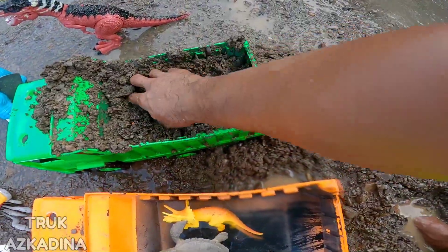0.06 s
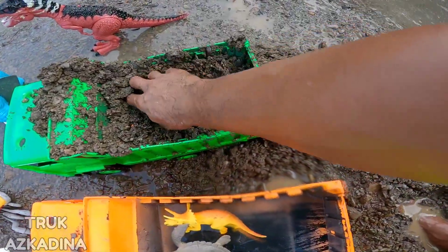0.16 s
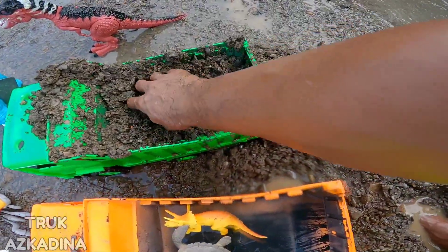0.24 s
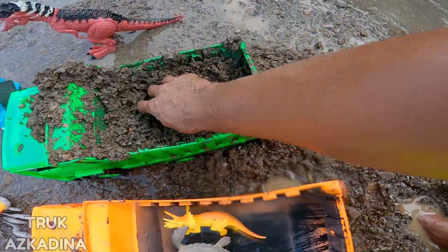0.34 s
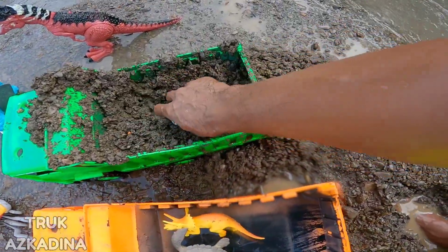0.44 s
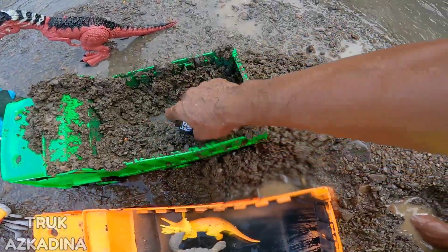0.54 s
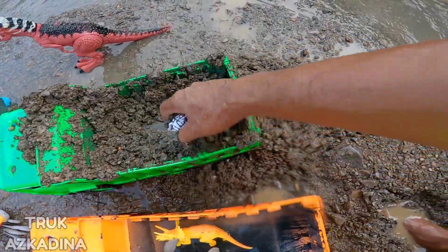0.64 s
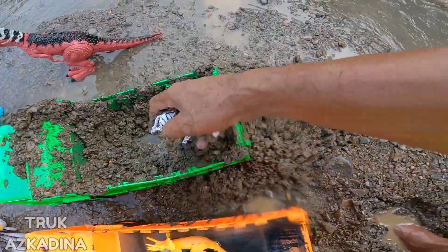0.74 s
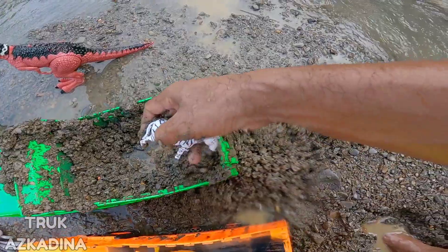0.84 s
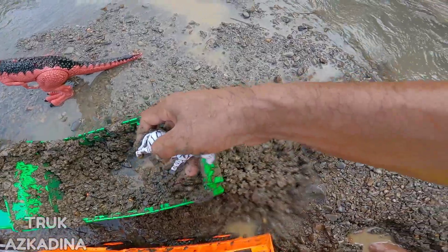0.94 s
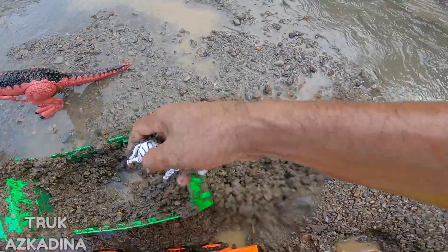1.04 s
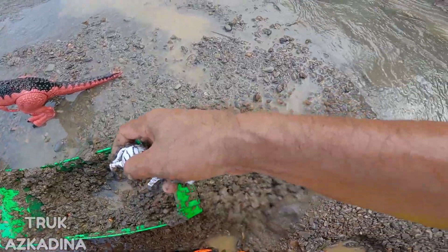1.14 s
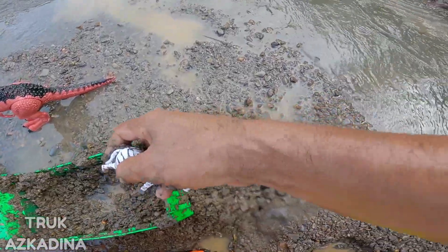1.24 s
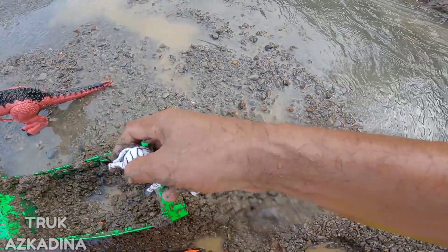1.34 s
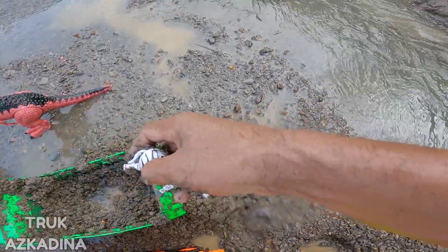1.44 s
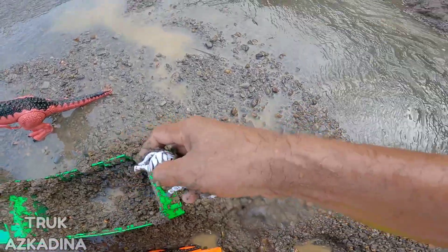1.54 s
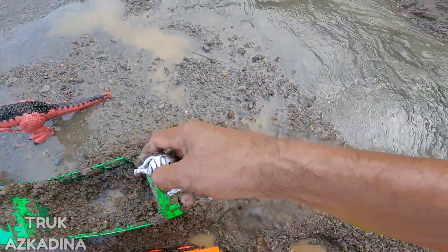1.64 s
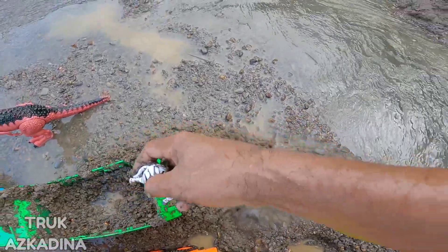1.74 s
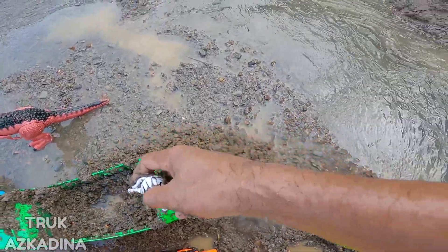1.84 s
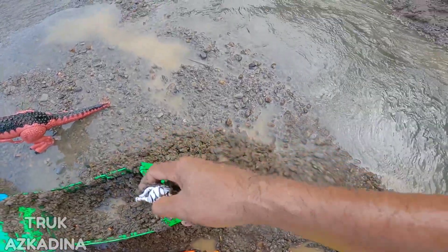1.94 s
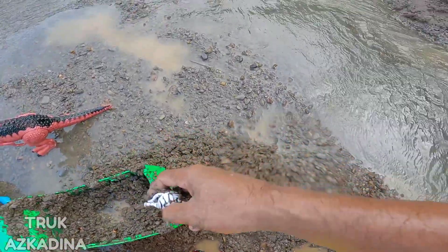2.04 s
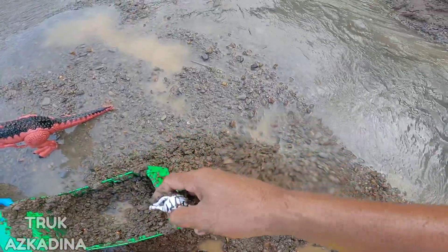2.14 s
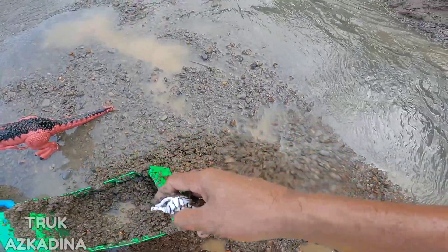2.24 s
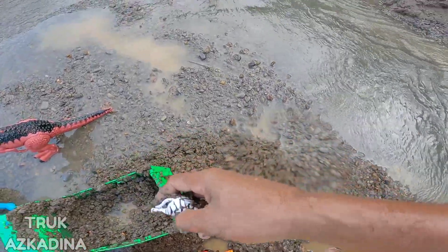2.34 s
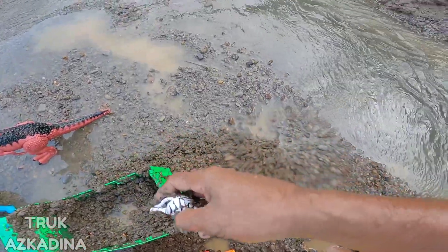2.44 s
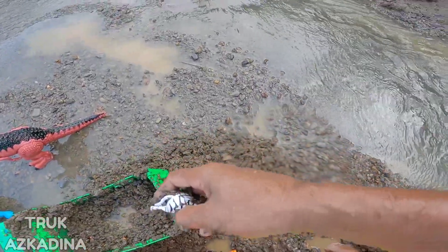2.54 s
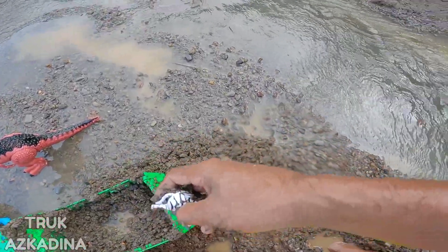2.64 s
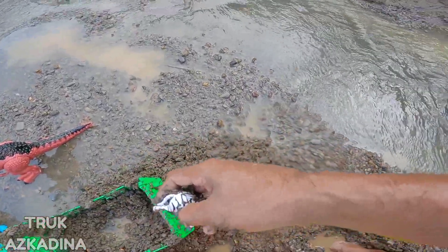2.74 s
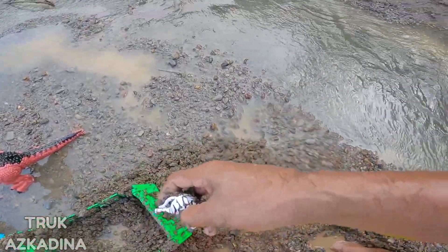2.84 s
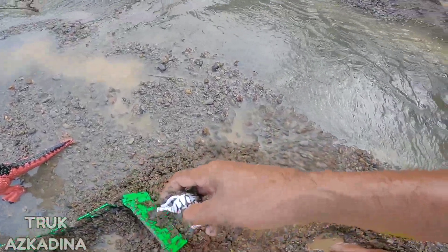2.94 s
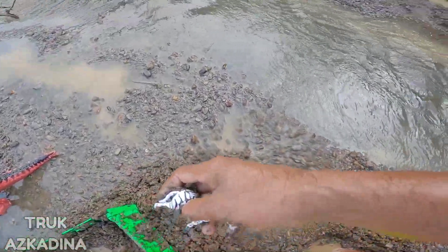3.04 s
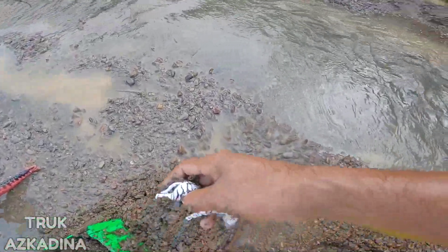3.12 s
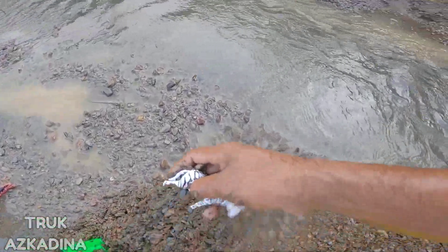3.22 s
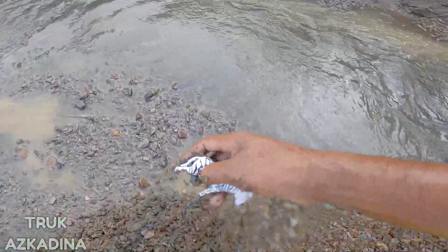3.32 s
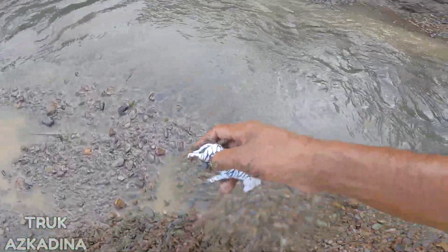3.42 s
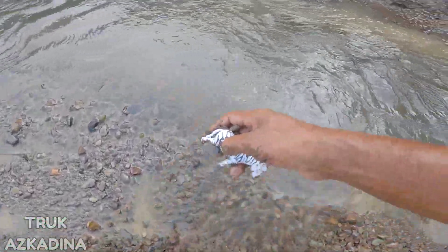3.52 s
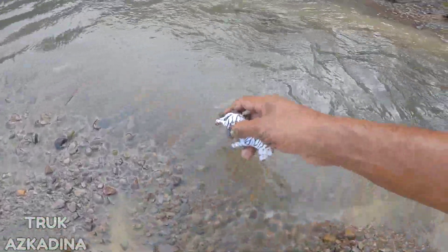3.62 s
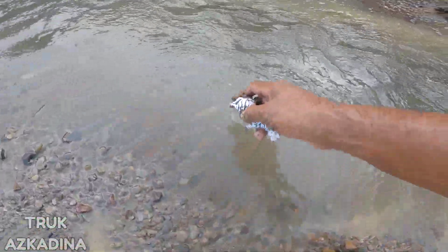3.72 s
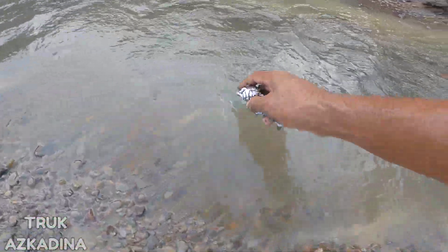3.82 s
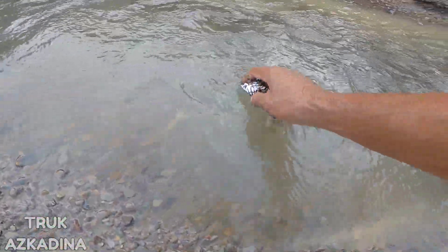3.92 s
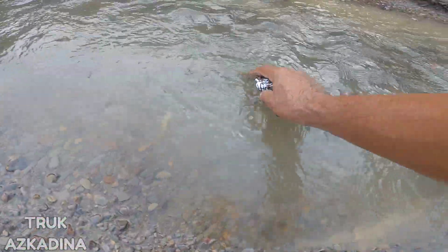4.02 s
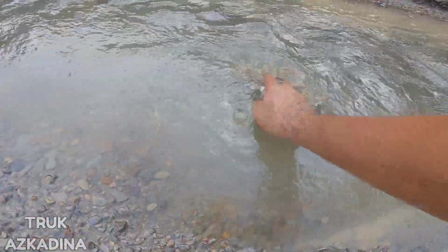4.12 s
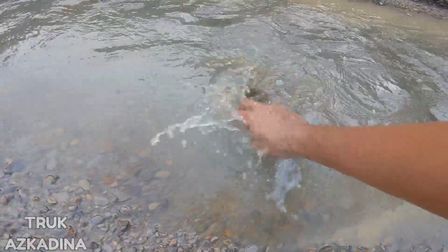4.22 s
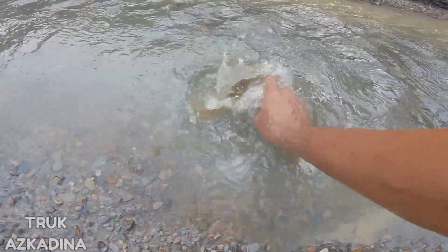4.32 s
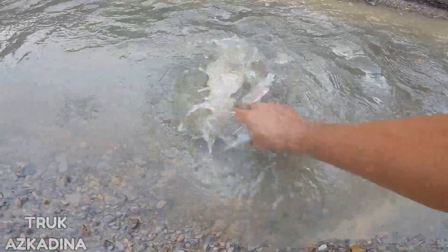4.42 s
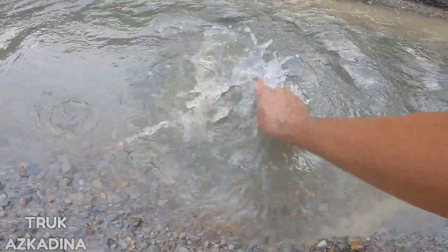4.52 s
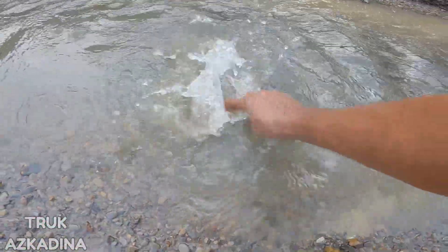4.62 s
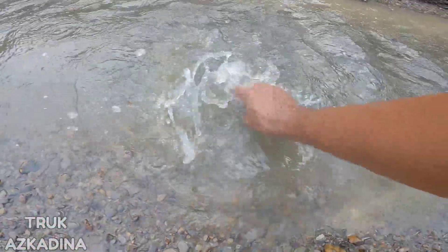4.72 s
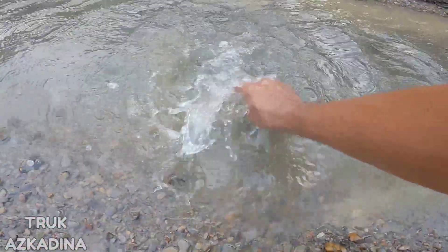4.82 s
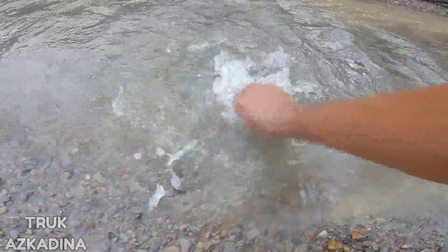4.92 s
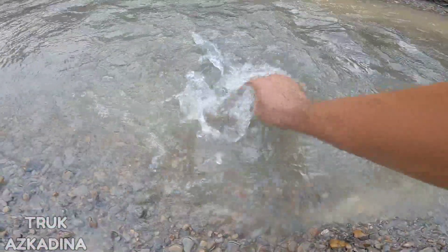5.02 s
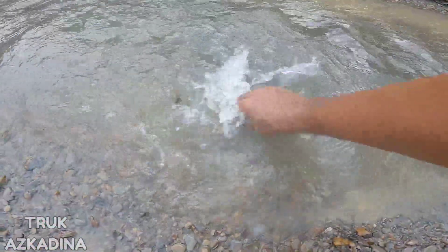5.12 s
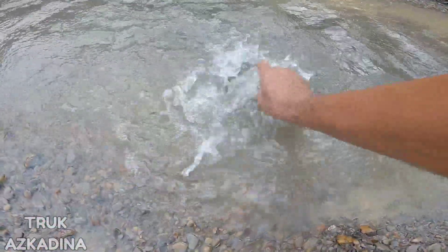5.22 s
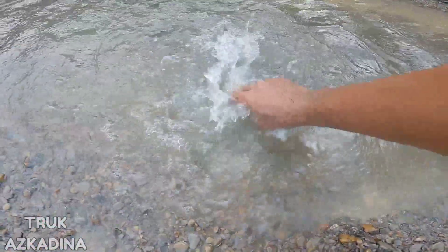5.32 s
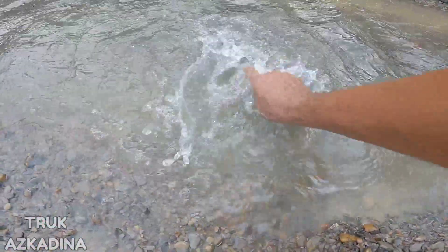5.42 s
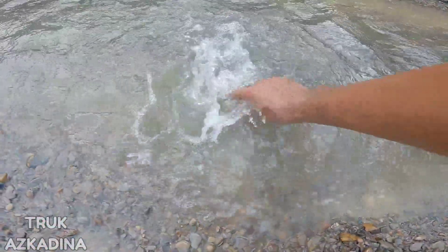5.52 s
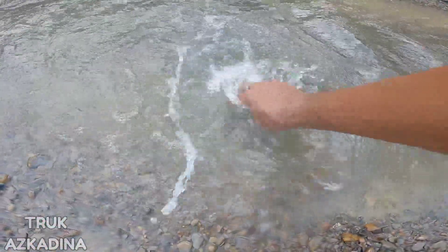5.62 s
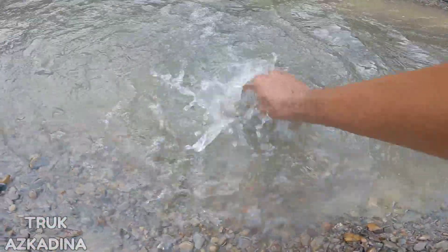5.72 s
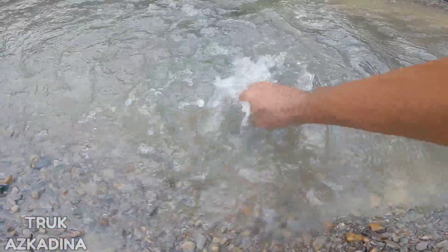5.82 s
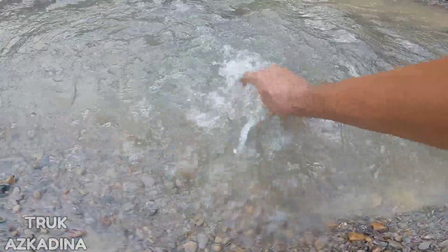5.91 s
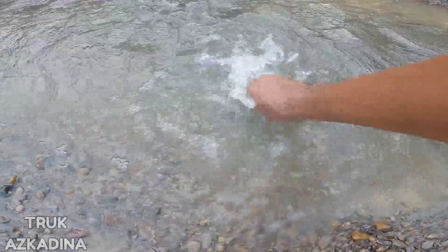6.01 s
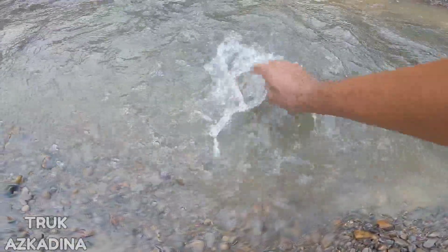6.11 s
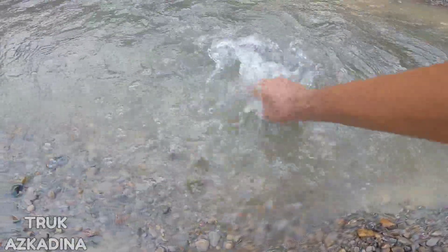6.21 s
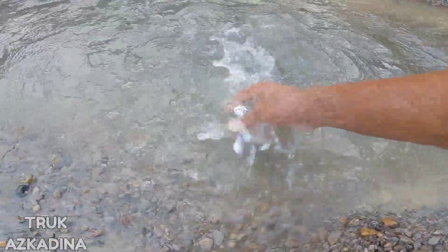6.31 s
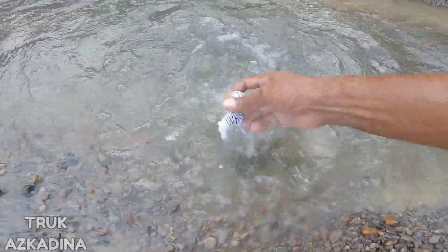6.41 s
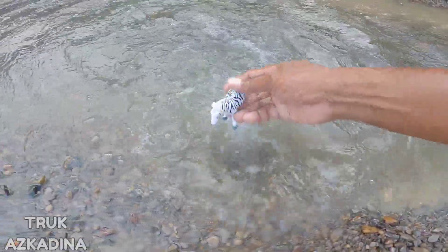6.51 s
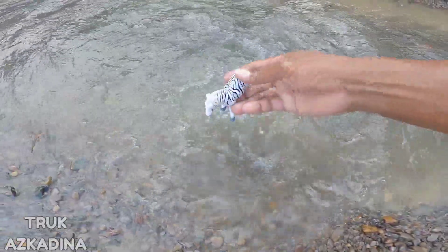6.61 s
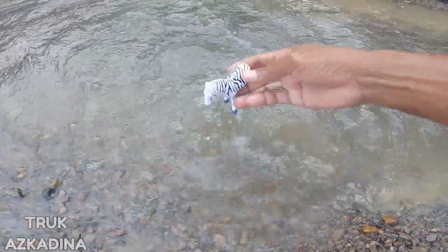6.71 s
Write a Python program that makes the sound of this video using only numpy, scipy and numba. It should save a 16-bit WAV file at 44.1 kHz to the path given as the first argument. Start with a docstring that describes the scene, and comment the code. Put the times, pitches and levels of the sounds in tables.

```python
"""A hand rakes wet gravel in a plastic tray by a shallow stream, then lifts a toy out and swishes it in water.
Stones and water are crowds of short damped rings under surging gain; single knocks and air pockets stand out.
Crickets are throbbing noise bands and pitch-sliding pulses; two birds are gliding sines with an echo.
Filtered noise makes the far stream, the breeze and a low drone, and damped swells make dull bumps.
The recorder's gain control turns down at the splashing."""
import sys
import numpy as np
from scipy import signal
from scipy.io import wavfile
from numba import njit

SR = 44100
rng = np.random.default_rng(int(sys.argv[2]) if len(sys.argv) > 2 else 0)


def materialize(psi):
    """Save the field psi as 16-bit PCM at rate SR to the path in sys.argv[1].

    A 1-D psi becomes a single channel; in a 2-D psi each row is a channel.
    """
    bounded = np.clip(np.atleast_2d(psi).T, -1, 1)
    quanta = np.round(bounded * 32767).astype(np.int16)
    wavfile.write(sys.argv[1], SR, quanta)


N = 298108


def amp(db):
    """Decibels to amplitude ratio: 20 dB is a factor of ten."""
    return 10 ** (np.asarray(db) / 20)


def rms_one(x):
    """Normalization of mean power: the result has rms 1."""
    return x / np.sqrt(np.mean(x ** 2) + 1e-20)


def in_time(rows):
    """Linear interpolation: each column after the time column becomes a curve over all samples."""
    s, *columns = np.transpose(rows)
    return [np.interp(np.arange(N) / SR, s, c) for c in columns]


def at_hz(points, hz):
    """Interpolation on a log-frequency axis, where equal ratios are equal steps."""
    point_hz, value = np.array(points)[:, 0], np.array(points)[:, 1]
    return np.interp(np.log(hz), np.log(point_hz), value)


def drift(rate):
    """Low-passed noise of spread 1: two equal poles at rate (Hz) leave only the slower fluctuations."""
    step = 40   # samples between computed points
    r = np.exp(-2 * np.pi * rate * step / SR)
    white = rng.standard_normal(N // step + 2002)
    slow = signal.lfilter([1], [1, -2 * r, r * r], white)[2000:]   # without the filter's start
    return np.interp(np.arange(N) / step, np.arange(len(slow)), rms_one(slow))


def narrow_noise(hz, width_hz, channels=1):
    """Resonance: white noise passed twice through one pole pair becomes a narrow band, here of rms 1."""
    r = np.exp(-np.pi * width_hz / SR)
    poles = [1, -2 * r * np.cos(2 * np.pi * hz / SR), r * r]
    once = signal.lfilter([1, 0, -1], poles, rng.standard_normal((channels, N)))
    return rms_one(signal.lfilter([1, 0, -1], poles, once))


@njit
def add(out, start, hz, cycles, rise, left, right, lead, attack):
    """Damped oscillation: sines (hz in cycles per sample) swell, lose 60 dB over cycles and glide by rise."""
    for k in range(len(start)):
        length = int(cycles[k] / hz[k]) + 1
        phase, fade, onset = 0., 1., 1.
        fade_step = 1000. ** (-1 / length)
        onset_step = np.exp(-hz[k] / attack)   # attack: time constant in cycles
        for i in range(min(length, out.shape[1] - start[k])):
            phase += 2 * np.pi * min(hz[k] * (1 + rise[k] * i / length), .45)
            fade, onset = fade * fade_step, onset * onset_step
            swell = (1 - onset) * fade
            out[0, start[k] + i] += left[k] * swell * np.sin(phase + lead[k])
            out[1, start[k] + i] += right[k] * swell * np.sin(phase)


def rings(s, hz, gain, cycles, rise, aside, spread=.2, spread_db=1.2, attack=.35):
    """Interaural cues: level and phase differences place each ring; aside 1 is fully to the right."""
    # Each row: frequency in Hz, left minus right level in dB, for a source to the right
    port_db = [(200, -1), (950, -3.5), (3770, -6), (9000, -1.5)]
    # Each row: frequency in Hz, phase in radians by which the left port leads
    port_lead = [(250, -0.3), (1000, -0.00099), (3900, -0.85), (6600, -0.41)]
    out, chance = np.zeros((2, N)), rng.standard_normal((len(s), 3))
    side = amp((aside * at_hz(port_db, hz) + spread_db * chance[:, 0]) / 2)
    # a shift of place counts more at short wavelengths
    lead = at_hz(port_lead, hz) + spread * chance[:, 1] * np.sqrt(hz / 3000)
    start, glide = (s * SR).astype(np.int64), rise * np.abs(chance[:, 2])
    add(out, start, hz / SR, cycles + 0 * s, glide, gain * side, gain / side, lead, attack)
    return out


def grains(span, low_hz, high_hz, spectrum, count, cycles, rise, size_db, clump_db, aside):
    """Superposition: random short rings, few large and many small, merge into clumpy noise; rms 1 in span."""
    draw = rng.random((count, 4))
    s = span[0] + (span[1] - span[0]) * draw[:, 0]
    hz = low_hz * (high_hz / low_hz) ** draw[:, 1]
    large_db = size_db * np.minimum(-np.log(draw[:, 2]), 6.5)
    size = amp(large_db + at_hz(spectrum, hz)) * hz   # higher rings are shorter and thinner spread
    sign = np.sign(draw[:, 3] - .5)
    ring_cycles = cycles * (1.5 - draw[:, 2])   # larger grains ring longer
    out = rings(s, hz, size * sign, ring_cycles, rise, aside, attack=1.4)
    return rms_one(out * amp(clump_db * drift(29.6))) * np.sqrt(N / SR / (span[1] - span[0]))


def bursts(events, level_db, octaves, lift, scatter_s, ring_s, aside, count):
    """Impact spectrum: each event sheds brief rings, fanned out in pitch and scattered just after it."""
    s, peak_db, hz = np.repeat(events, count, axis=0).T
    draw = rng.standard_normal((len(s), 3))
    fan = np.arange(len(s)) % count / count - .5
    hz = hz * 2 ** (lift + octaves * fan + draw[:, 0] / count)   # lift in octaves
    gain = amp(peak_db + level_db + 6.7 * draw[:, 2]) * (hz < 9000)   # none from 9 kHz up
    return rings(s + scatter_s * draw[:, 1] ** 2, hz, gain, ring_s * hz, 0, aside)


def surges(s, held_s, level_db, rise_db_s, fall_db_s):
    """Addition of powers: each surge climbs, holds and dies at steady dB rates in one gain curve."""
    power, t = np.zeros(N // 40 + 2), np.arange(N // 40 + 2) * 40 / SR
    for at, held, top_db in zip(s, held_s, level_db):
        climb_db = rise_db_s * np.maximum(at - t, 0)
        fall_db = fall_db_s * np.maximum(t - at - held, 0)
        power += amp(top_db - climb_db - fall_db) ** 2
    return np.interp(np.arange(N) / SR, t, np.sqrt(power))


def air():
    """Partial coherence: distant stream and breeze, noise bands that the ears share in part, and a drone."""
    # Each row: frequency in Hz, relative band level in dB
    air_spectrum = [(25, -6), (190, -13.5), (260, -31), (800, -39), (1400, -34), (2600, -45), (5500, -37),
                    (8500, -42), (15500, -64.5)]
    # Each row: frequency in Hz, left-right likeness from 0 to 1
    likeness = [(60, 1), (150, 0.92), (300, 0.1), (15000, 0.49)]
    air_db, drone_hz, drone_width_hz, drone_db = -35.5, 152.2, 13.3, -39.5
    out, white = 0, rng.standard_normal((2, 2, N))
    edges = 22 * 2 ** np.arange(0, 9.6, .5)   # half-octave bands
    for k, (low, high) in enumerate(zip(edges, edges[1:])):
        band = signal.butter(3, [low, high], "band", fs=SR, output="sos")
        mid, side = signal.sosfilt(band, white[k % 2])
        hz = np.sqrt(low * high)
        alike = np.clip(at_hz(likeness, hz), 0, 1)
        waver_db = 3.4 * drift(14.5) if hz < 250 else 2.0 * drift(5.4)
        stereo = np.sqrt(1 + alike) * mid + np.sqrt(1 - alike) * side * [[1], [-1]]
        out = out + amp(at_hz(air_spectrum, hz) + waver_db) * stereo
    return amp(air_db) * rms_one(out) + amp(drone_db) * narrow_noise(drone_hz, drone_width_hz)


def crickets(second_s=0.0148, rise_s=0.0026, low_hz=5550, high_hz=6000):
    """Amplitude modulation: a throbbing chorus, and a near singer whose paired wing strokes slide up in pitch."""
    # Each row: centre in Hz, width in Hz, level in dB before the throb, chirps per second
    chorus = [(6867, 160, -51, 6.8), (7286, 63, -47.5, 24), (6930, 530, -44.5, 31)]
    # Each row: time in seconds, lateness of the double chirp in cycles, level in dB
    near_cricket = [(0, 0.71, -43), (.6, 0.69, -38), (.9, 0.26, -38.5), (1.9, 0.47, -39), (3.85, 0.59, -35),
                    (4.2, 0.58, -32)]
    pairs_per_s = 27.6
    out, t = 0, np.arange(N) / SR
    for hz, width_hz, level_db, per_s in chorus:
        throb = .5 + .5 * np.sin(2 * np.pi * (per_s * t + 0.26 * drift(0.34)))
        shared, opposed = narrow_noise(hz, width_hz, channels=2)
        stereo = shared + 0.34 * opposed * [[1], [-1]]
        out = out + amp(level_db + 2.0 * drift(0.4)) * (0.85 + throb) * stereo
    late, level_db = in_time(near_cricket)
    first = (pairs_per_s * t - late) % 1 / pairs_per_s   # seconds since the pair began
    age = np.where(first > second_s, first - second_s, first) / rise_s
    hz = high_hz - (high_hz - low_hz) * np.exp(-age / 0.58) + 45 * drift(62.0)
    stroke = age * np.exp(1 - age)
    tone = stroke * np.sin(2 * np.pi * np.cumsum(hz) / SR)
    return out + amp(level_db + 2.0 * drift(6.8)) * tone * amp([[-.8], [.8]])


def birds(echo_db=-8, echo_s=0.13):
    """Frequency modulation: gliding sines whistle twice, a fainter bird answers, and trees echo both."""
    # Each row: start in seconds, level in dB added to the whistle's
    calls = [(1.805, -38.5), (2.165, -44)]
    # The two-note whistle. Each row: seconds from the call's start, pitch in Hz, level in dB
    whistle = [(.01, 2695, -30), (0.043, 3330, -2), (0.061, 3000, -9), (0.091, 3220, -0.5),
               (.115, 3200, -27), (.13, 3950, -12), (.157, 2980, -8), (0.183, 3240, 1), (0.207, 3285, -2)]
    # The farther bird's falling notes. Each row: start in seconds, first pitch in Hz, level in dB
    far_notes = [(3.314, 4640, -54), (3.39, 3500, -55), (3.57, 4280, -49), (3.65, 3440, -49)]
    far_note_s, far_fall_hz = .04, 402
    out, t = np.zeros(N), np.arange(N) / SR
    for start, call_db in calls:
        call = np.array(whistle) + [start, 0, call_db]
        hz, level_db = in_time(call)
        sounding = (t > call[0, 0]) * (t < call[-1, 0])
        gain = np.sqrt(2) * amp(level_db + 5.3 * drift(100))   # sqrt 2 turns rms into sine peak
        out += gain * sounding * np.sin(2 * np.pi * np.cumsum(hz) / SR)
    for start, from_hz, level_db in far_notes:
        along = np.clip((t - start) / far_note_s, 0, 1)
        note = np.sin(2 * np.pi * np.cumsum(from_hz - far_fall_hz * along) / SR)
        out += np.sqrt(2) * amp(level_db) * np.sin(np.pi * along) * note
    # decaying noise of unit energy as the trees' impulse response
    trees = rng.standard_normal((2, SR // 2)) * np.exp(-t[:SR // 2] / echo_s) / np.sqrt(echo_s * SR / 2)
    echo = signal.fftconvolve(out[None], trees, axes=1)[:, :N]
    return out * amp([[1.5], [-1.5]]) + amp(echo_db) * echo


def bumps():
    """Heavily damped resonance: dull bumps through the handheld recorder die within a few cycles."""
    # Each row: start in seconds, peak of the envelope in dB
    bump_events = [(0.079, -27.5), (0.453, -24), (0.887, -23), (4.001, -20.5)]
    bump_hz, bump_s = 113.4, 0.022   # pitch, time from start to the envelope's peak
    out = np.zeros(N)
    for s, peak_db in bump_events:
        age = np.maximum(np.arange(N) / SR - s, 0) / bump_s
        out += amp(peak_db) * age * np.exp(1 - age) * np.sin(2 * np.pi * bump_hz * bump_s * age)
    return out


def gravel(aside=0.16):
    """Impact excitation: colliding stones ring briefly, a dense crackle under each stroke plus crunchy knocks."""
    # Raking strokes. Each row: time of full strength in seconds, hold in seconds, level in dB
    rake = [(.14, 0.078, -51.5), (.35, 0.099, -49.5), (0.428, 0.28, -39.5), (.8, 0.02, -53)]
    # Each row: frequency in Hz, relative power density in dB per Hz
    gravel_spectrum = [(250, -22), (507, 0.5), (809, -7.5), (1730, 0), (7380, -10), (12000, -31),
                       (15500, -43)]
    # Single stones knocking. Each row: start in seconds, ring level in dB, ring pitch in Hz
    stones = [(0.001, -3, 683), (0.101, -20.5, 1830), (0.26, -10.5, 3240), (0.329, -20, 1380),
              (0.415, -1.5, 1690), (0.569, 0.5, 1610), (0.581, -11.5, 5590), (0.622, -6, 1340),
              (0.681, -4.5, 835), (0.704, -8, 890), (0.716, -7.5, 1040), (1.046, -22, 4700),
              (1.229, -23.5, 1230), (1.253, -15, 4870), (1.94, -17.5, 8500), (1.991, -20, 1120),
              (2.013, -19.5, 3630), (2.101, -28.5, 730), (2.143, -22.5, 5200), (3.148, -15, 4440),
              (3.172, -12, 4342), (3.754, -29.5, 2220)]
    stroke = surges(*np.transpose(rake), rise_db_s=162, fall_db_s=225)
    crackle = grains((0, 1.5), 317, 16800, gravel_spectrum, count=16000, cycles=12.0, rise=0,
                     size_db=2.3, clump_db=1.2, aside=aside)
    s, peak_db, hz = np.transpose(stones)
    knock = rings(s, hz, amp(peak_db), cycles=11.9, rise=0, aside=aside)
    crunch = bursts(stones, level_db=-13.5, octaves=1.86, lift=0.26, scatter_s=0.0015,
                    ring_s=0.0056, aside=aside, count=12)
    return stroke * crackle + knock + crunch


def splashing():
    """Bubble resonance: bubbles slosh low, droplets fizz high; air pockets slap shut and ring upward."""
    # The hand shakes the toy to and fro, each stroke a surge of water.
    # Each row: time of its height in seconds, slosh level in dB, spray level in dB
    strokes = [(4.166, -44, -33), (4.35, -16, -11.5), (4.469, -4.5, -9), (4.543, -6, -9),
               (4.656, -11, -13.5), (4.739, -12, -13), (4.87, -10.5, -17.5), (5.011, -11, -12),
               (5.082, -6.5, -14), (5.177, -8.5, -12.5), (5.273, -6, -16), (5.364, -6, -15.5),
               (5.442, -5.5, -11.5), (5.553, -11.5, -18.5), (5.621, -8.5, -11), (5.717, -15, -12),
               (5.814, -8, -8), (5.889, -4, -15), (5.983, -9, -9.5), (6.158, -6, -18), (6.261, -9, -40),
               (6.373, -4.5, -8.5), (6.444, -12.5, -17), (6.563, -19.5, -16), (6.627, -27.5, -21),
               (6.694, -28.5, -26.5), (6.75, -50, -32)]
    # Water unsettled between later strokes: start in seconds, hold in seconds, slosh in dB, spray in dB
    churn = (4.5, 2, -19, -21.5)
    # Each row: frequency in Hz, relative power density in dB per Hz
    water_spectrum = [(220, -32), (575, -5.5), (1130, -4), (2150, -11.5), (7080, -22), (12300, -41.5),
                      (15500, -49)]
    # Drips and large air pockets closing. Each row: start in seconds, ring level in dB, first pitch in Hz
    plops = [(3.939, -27, 1820), (3.987, -8, 1736), (4.021, -15.5, 1740), (4.075, -25, 1470),
             (4.124, -25, 1450), (4.162, -7, 1473), (4.188, -8.5, 3670), (4.275, -8, 3120),
             (4.302, -3.5, 1520), (4.319, 2, 4970), (4.331, -4, 713), (4.348, 5.5, 6030), (4.385, 1, 720),
             (4.428, -1, 607), (4.449, 10, 1870), (4.529, 11.5, 1130), (4.711, 7.5, 944), (4.858, 6.5, 900),
             (4.9, 8.5, 583), (4.996, 7.5, 884), (5.045, 4.5, 706), (5.068, 8.5, 600), (5.177, 7, 900),
             (5.259, 10.5, 804), (5.329, 6, 720), (5.344, 8.5, 737), (5.405, 6.5, 900), (5.433, 8, 890),
             (5.513, 0.5, 600), (5.597, 10.5, 1160), (5.71, 6, 1185), (5.787, 7, 620), (5.848, 10, 1100),
             (5.903, 9, 976), (5.963, 6, 370), (5.99, 9, 1260), (6.029, 4, 410), (6.144, 9.5, 1120),
             (6.256, 3.5, 956), (6.346, 12, 1166), (6.367, 11.5, 1190), (6.403, 9, 1140), (6.49, 6.5, 326),
             (6.542, 6, 723), (6.604, -13, 3850), (6.667, -5.5, 887)]
    surge_rise_db_s, surge_fall_db_s = 452, 320
    surge_rows = [(s, 0, *levels) for s, *levels in strokes] + [churn]
    s, held_s, slosh_db, spray_db = np.transpose(surge_rows)
    span = (4.0, N / SR)
    slosh = grains(span, 224.7, 2598, water_spectrum, count=11000, cycles=19.8, rise=0.38,
                   size_db=2.5, clump_db=0.66, aside=0.76)
    spray = grains(span, 2285, 15150, water_spectrum, count=40000, cycles=13.0, rise=0.17,
                   size_db=3.5, clump_db=3.0, aside=0.4)
    slosh_gain = surges(s, held_s, slosh_db, surge_rise_db_s, surge_fall_db_s)
    spray_gain = surges(s, held_s, spray_db, surge_rise_db_s, surge_fall_db_s)
    water = slosh_gain * slosh + spray_gain * spray
    s, peak_db, hz = np.transpose(plops)
    ring_cycles = 41.6 * np.sqrt(np.minimum(hz / 1500, 1))   # big pockets break up after fewer cycles
    plop = rings(s, hz, amp(peak_db), cycles=ring_cycles, rise=0.31, aside=0.81, attack=0.55)
    slap = bursts(plops, level_db=-15.5, octaves=1.74, lift=0.785, scatter_s=0.0016,
                  ring_s=0.013, aside=0.49, count=10)
    # reduces the low thud that abrupt ring onsets add below 180 Hz
    high_pass = signal.butter(4, 180, "high", fs=SR, output="sos")
    return signal.sosfilt(high_pass, water + plop + slap)


def scene():
    """Linear superposition: the pressures of all sources at the stream bank add."""
    return air() + crickets() + birds() + bumps() + gravel() + splashing()


def record(dry, input_db=-6):
    """Compression: gain follows loudness quickly and lets go slowly; peaks are rounded, the top is cut."""
    knee_db, ratio = -27, .45   # gain falls by ratio dB for each dB above the knee
    release_db_s, listen_s = 1.5, .15   # release of the held loudness, averaging time constant
    top, cutoff_hz = 1.5, 15700   # saturation amplitude, start of the stop band
    sound, r = amp(input_db) * dry, np.exp(-1 / (listen_s * SR))
    power = signal.lfilter([1 - r], [1, -r], np.mean(sound ** 2, axis=0))
    loud_db = 10 * np.log10(power + 1e-9)
    slope = release_db_s * np.arange(N) / SR
    held_db = np.maximum.accumulate(loud_db + slope) - slope
    sound = sound * amp(-ratio * np.maximum(held_db - knee_db, 0))
    low_pass = signal.cheby2(12, 70, cutoff_hz, fs=SR, output="sos")
    return signal.sosfilt(low_pass, top * np.tanh(sound / top))


dry = scene()
out = record(dry)
materialize(out)
```